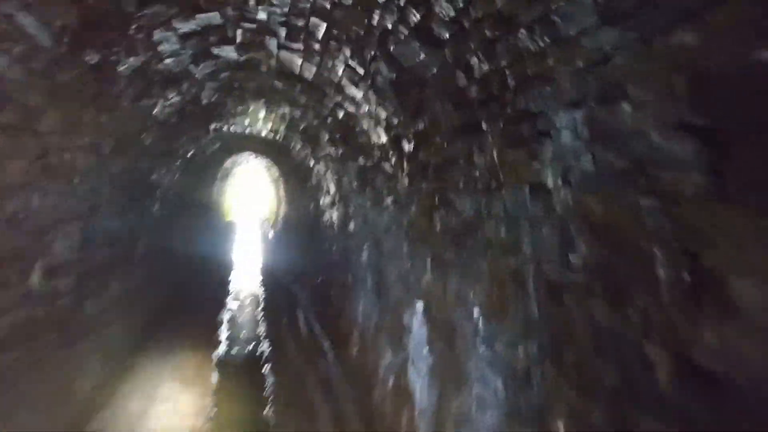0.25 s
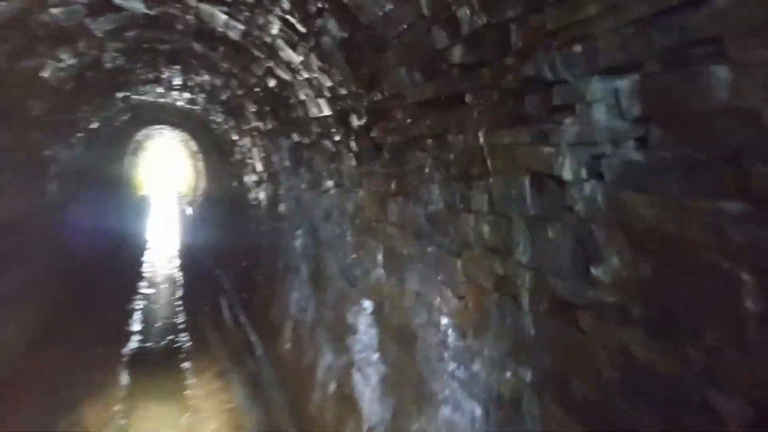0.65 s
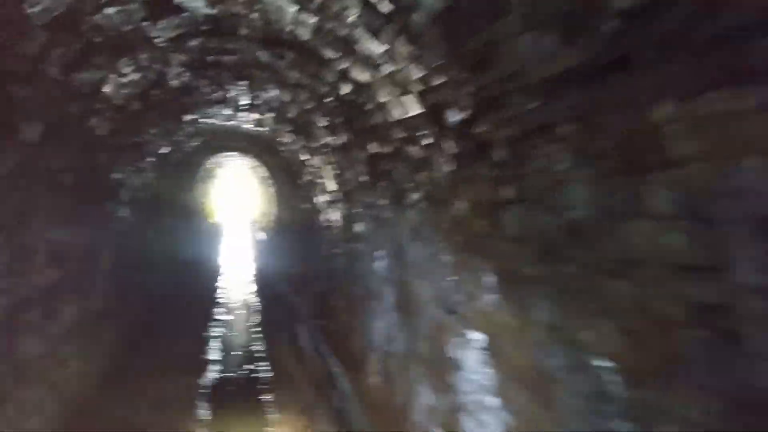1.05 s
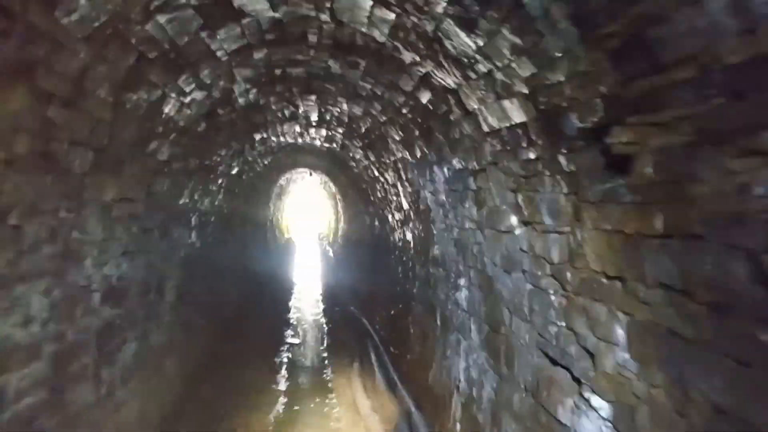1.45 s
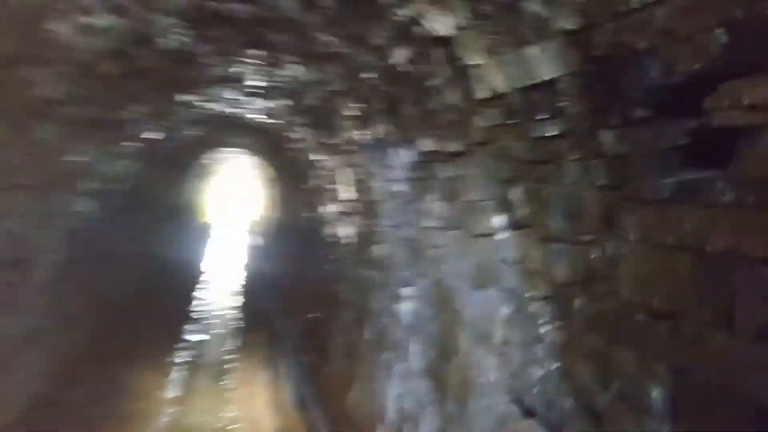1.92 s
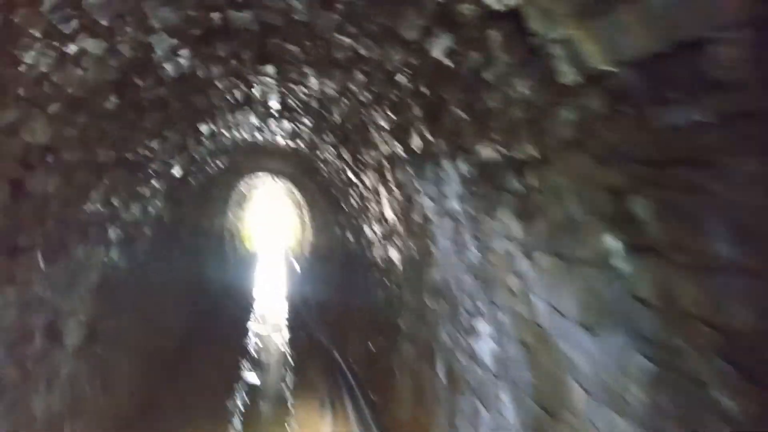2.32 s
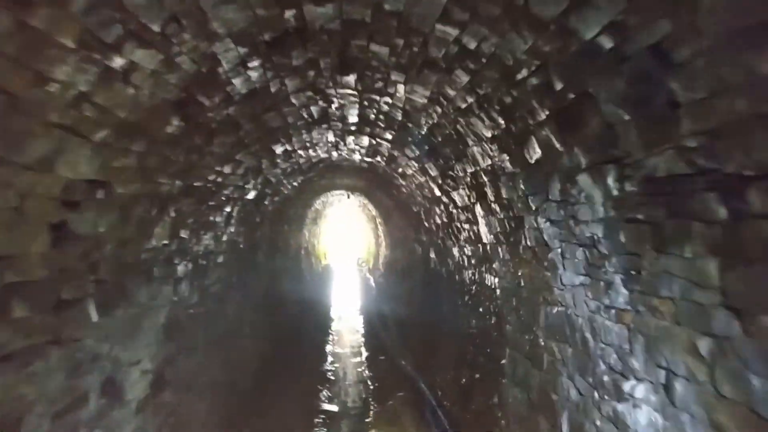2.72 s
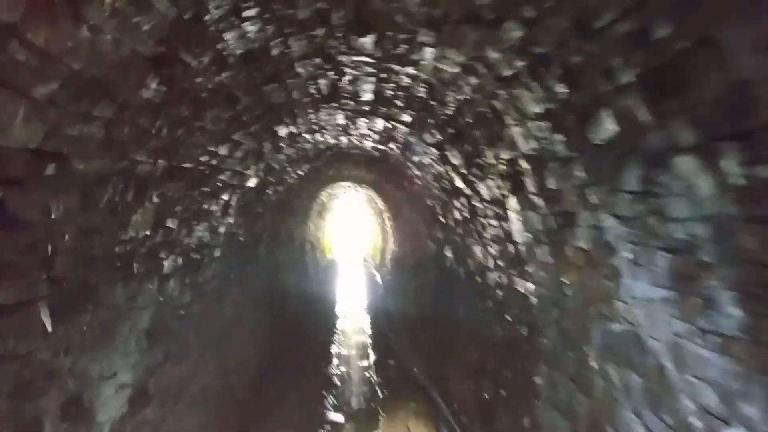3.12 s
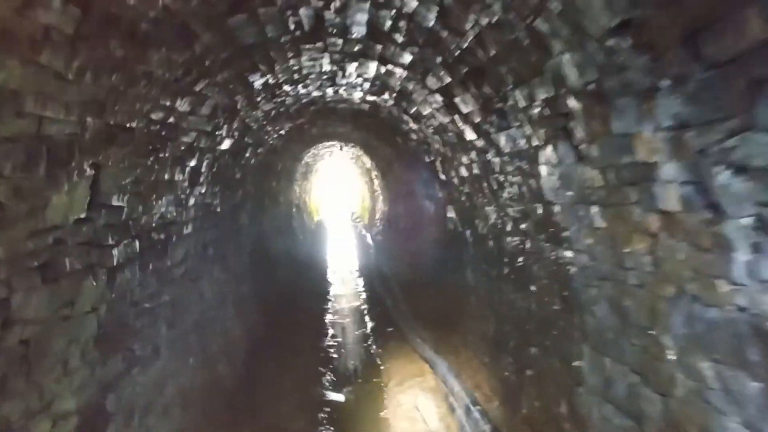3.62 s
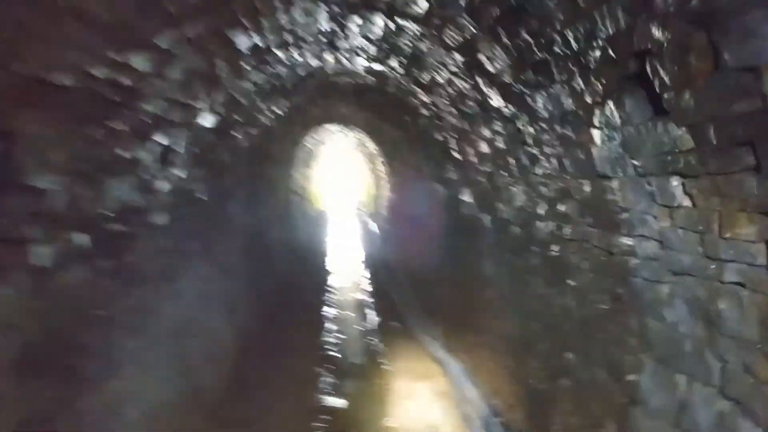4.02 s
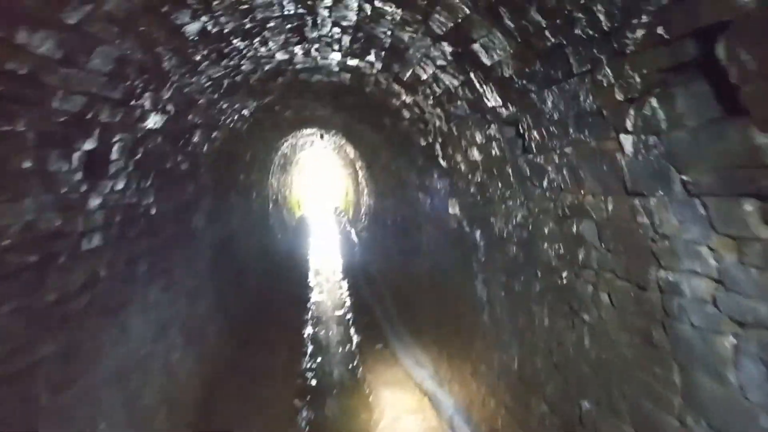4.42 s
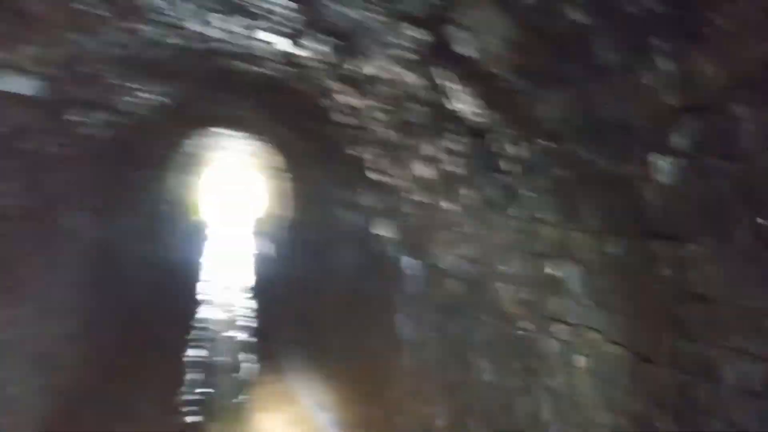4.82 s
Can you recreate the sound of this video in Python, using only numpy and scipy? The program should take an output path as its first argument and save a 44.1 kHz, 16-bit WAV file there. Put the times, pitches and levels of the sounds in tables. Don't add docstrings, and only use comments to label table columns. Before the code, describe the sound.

Feet wade briskly through shallow water in a stone tunnel, with bright splashes, droplet bursts, bubbly plops and a short arched-wall echo.

```python
import sys
import numpy as np
from scipy import signal
from scipy.io import wavfile
from scipy.ndimage import uniform_filter1d

SR = 44100
rng = np.random.default_rng(int(sys.argv[2]) if len(sys.argv) > 2 else 0)


def unload_audio(sound):
    columns = np.transpose(np.atleast_2d(sound))
    steps = np.round(np.clip(columns, -1, 1) * 32767)
    wavfile.write(sys.argv[1], SR, steps.astype(np.int16))


def level_to_linear(level):
    exponent = np.asarray(level, float) / 20
    return 10 ** exponent


N = 222836

# start in seconds, peak level in dB, pitch in Hz, length in seconds.
HEEL_THUDS = [(0.06, -62, 96, 0.04), (0.183, -64, 89.5, 0.032), (0.821, -58, 179, 0.05),
              (1.193, -63, 82, 0.069), (1.65, -53, 145, 0.079), (2.188, -56, 73, 0.029),
              (2.493, -64, 91, 0.058), (2.632, -52, 74, 0.034), (3.38, -46, 150, 0.026),
              (4.066, -59, 78.1, 0.057), (4.335, -48, 123, 0.061), (4.706, -64, 59.2, 0.03),
              (.26, -70, 112, 0.055), (.9, -64, 91, 0.048), (.993, -70, 121, .05), (1.72, -68, 70.6, 0.046),
              (2.41, -66, 85, 0.072), (2.915, -73, 82, .05), (3.189, -76, 60, .05), (3.65, -74, 132, 0.044),
              (3.806, -72, 92, 0.046), (4.901, -67, 95, 0.049)]
# frequency in Hz, level in dB per Hz.
SPRAY_COLOUR = [(180, -24), (300, -19), (462, -29), (546, -14.5), (1060, -9.5), (2520, 2.5), (4750, 1.5),
                (6520, 5.5), (8090, -4), (9880, 1.5), (12300, -4.5), (14700, -7), (16000, -8)]
# frequency in Hz, level in dB per Hz.
SLOSH_COLOUR = [(300, -26), (450, -10), (600, 2), (1000, 1.5), (1400, -4), (2200, -26)]
# frequency in Hz, level in dB per Hz.
HUSH_COLOUR = [(15, -61), (25, -6), (363, 5), (451, -26), (624, -18), (3080, -9), (4740, -33), (6560, -8),
               (7920, 3), (10400, 17), (16000, -8)]
# frequency in Hz, time to fall 60 dB in seconds.
TUNNEL_T60 = [(300, 0.16), (800, 0.26), (2000, 0.18), (6000, 0.068), (14000, 0.12)]
# frequency in Hz, level in dB per Hz.
BOOM_COLOUR = [(130, -22), (200, -30.5), (250, -11.5), (330, -1), (420, -15), (600, -30.5)]
# start in seconds, level in dB, first pitch in Hz, last pitch in Hz, length in seconds.
SLURPS = [
    (1.985, -44.5, 1850, 3600, 0.065),
    (2.004, -43, 4900, 7000, .028),
    (2.005, -44, 3300, 4300, 0.035),
    (2.02, -46, 6300, 8000, 0.03),
    (1.3, -53, 2300, 3600, .04),
    (2.769, -60, 339, 185.2, .12),
    (4.843, -41.5, 1060, 1680, 0.032),
]
# time in seconds, peak level in dB, cavity pitch in Hz, time to fall 60 dB in seconds.
LATE_CLUMPS = [
    (0.422, -37, 3050, 0.042),
    (1.0692, -25.5, 5400, 0.12),
    (2.2843, -26.5, 2350, 0.11),
    (3.2342, -32, 2280, 0.19),
    (2.752, -25, 2780, 0.12),
    (3.9625, -39, 2660, 0.15),
    (4.484, -33, 1930, 0.083),
]
# time in seconds, peak level in dB, cavity pitch in Hz, time to fall 60 dB in seconds.
SHEETS = [(0.234, -26, 6300, 0.28), (0.722, -27, 5400, 0.26), (1.156, -32, 5000, 0.29),
          (1.5504, -27, 4400, 0.31), (1.8236, -30, 5500, 0.15), (2.423, -33.5, 5400, 0.24),
          (2.494, -24.5, 6400, 0.23), (2.948, -27.5, 7600, 0.14), (3.2036, -29, 7220, 0.28),
          (3.59, -42.5, 8700, 1), (3.629, -36.5, 9100, 0.32), (0.795, -36, 6500, .1),
          (3.205, -28, 14000, 0.2), (3.9378, -26, 1930, 0.47), (4.674, -28.5, 2700, 0.25),
          (3.0, -45.5, 12000, 0.94), (0.54, -49, 10500, 0.055), (.87, -48, 13000, 0.54),
          (4.549, -42, 12000, .3), (0.45, -43.5, 6000, 0.22)]
# time in seconds, peak level in dB, cavity pitch in Hz, time to fall 60 dB in seconds.
SLAPS = [(0.271, -25.5, 2640, 0.092), (0.342, -29, 7600, 0.21), (0.646, -34.5, 2625, 0.16),
         (0.8017, -20, 8000, 0.034), (1.052, -24, 6850, 0.21), (1.442, -27.5, 2600, 0.22),
         (1.6245, -37, 2240, 0.15), (1.724, -29, 5470, 0.082), (1.7998, -29, 3600, 0.28),
         (1.8827, -31.5, 6530, 0.23), (1.943, -37, 3400, 0.13), (2.262, -27, 4050, 0.44),
         (2.3672, -31, 4100, 0.36), (3.106, -28, 3670, 0.14), (3.3471, -37, 3320, 0.58),
         (3.4031, -32, 2520, 0.19), (3.708, -22, 6800, 0.084), (4.13, -27, 7250, 0.27),
         (4.443, -24, 2650, 0.13), (4.5651, -29.5, 3800, 0.22), (4.7083, -29.5, 3680, 0.097),
         (4.81, -24, 4100, 0.24)]
# time in seconds, peak level in dB, cavity pitch in Hz, time to fall 60 dB in seconds.
LUMPS = [(0.0853, -37.5, 2520, 0.16), (0.439, -38.5, 3020, .13), (0.995, -34.5, 1880, 0.2),
         (2.0135, -34, 7050, 0.23), (2.1134, -35, 2080, 0.26), (2.5839, -35.5, 3200, 0.062),
         (2.6763, -34, 6100, 0.21), (2.701, -31.5, 4300, 0.05), (3.157, -25.5, 4500, 0.15),
         (3.2636, -36, 2700, 0.16), (4.0047, -27.5, 3950, .14), (4.0534, -32.5, 3300, 0.12),
         (4.3167, -36, 2020, 0.47), (1.2116, -46, 1900, 0.13), (4.6065, -32, 2240, 0.25),
         (4.728, -27, 3640, 0.12)]
# time in seconds, peak level in dB, cavity pitch in Hz, time to fall 60 dB in seconds.
FIRST_CONTACTS = [(0.24, -23.5, 6000, 0.025), (0.271, -28, 5800, .03), (0.3422, -23, 6400, 0.031),
                  (1.054, -23.5, 6600, .05), (1.212, -38, 2250, 0.023), (1.32, -41, 1460, 0.097),
                  (1.372, -42, 3700, 0.23), (1.442, -27.5, 3250, 0.065), (1.5563, -24, 4600, 0.056),
                  (1.799, -21.5, 4100, 0.02), (1.9452, -32.5, 3430, .025), (2.494, -23, 4500, .025),
                  (1.8252, -25.5, 6100, .025), (0.802, -31, 6500, 0.026), (3.1054, -25.5, 3140, 0.022),
                  (3.152, -22.5, 9600, 0.05), (3.156, -25, 4260, .03), (3.704, -29, 6500, 0.057),
                  (3.7096, -24, 4400, 0.043), (3.859, -44, 2800, .1), (3.944, -30, 8550, 0.064),
                  (4.005, -29, 4600, 0.03), (4.13, -28, 3000, 0.036), (4.443, -40, 2900, 0.1),
                  (4.5645, -37.5, 3200, .04), (4.6784, -42, 6500, 0.021), (4.6785, -22.5, 1600, 0.032),
                  (4.81, -22.5, 4330, .03), (0.2344, -29.5, 4500, 0.046), (3.201, -28.5, 9000, .04),
                  (4.805, -28, 3500, 0.052), (4.963, -42.5, 3200, 0.11)]
# brightness in dB per octave, swell in milliseconds,
# thinness in dB lost per octave under LOW_HZ.
LANDING = [
    (2, 5.9, 7),
    (-1.5, 7.5, 3),
    (-4.5, 5.6, 2.5),
    (-2.5, 10, 3),
    (-1.5, 1.2, 5),
]
# time in seconds, level in dB, pitch in Hz.
POPS = [(.272, -33, 5640), (.438, -29, 3080), (.8, -22, 6560), (.803, -33, 2430), (1.084, -43, 543),
        (1.127, -35, 700), (1.2125, -25.5, 1780), (1.801, -16, 3975), (2.263, -30, 3560),
        (2.492, -30, 4400), (2.518, -34, 2240), (3.105, -29, 5180), (3.158, -20.5, 4340), (3.39, -30, 300),
        (3.938, -22, 1900), (3.963, -27, 2584), (4.131, -26, 2630), (4.607, -22.5, 1790),
        (4.609, -16.5, 2470), (4.618, -23, 2070), (4.726, -38, 285), (.189, -38, 900), (.421, -36.5, 6900),
        (.495, -42, 4200), (.516, -39, 6100), (.826, -33, 2600), (.834, -32, 2900), (.862, -31, 2350),
        (.944, -37, 2300), (1.069, -28, 3700), (1.625, -31, 2500), (1.727, -31, 3020), (2.29, -26, 3200),
        (2.3, -28, 2300), (2.368, -32, 3800), (2.7, -33, 4500), (3.216, -30, 6400), (3.233, -30, 2700),
        (3.243, -30, 2310), (3.266, -31, 2700), (3.349, -31.5, 3600), (3.713, -26, 4410), (3.92, -37, 3400),
        (3.932, -33, 1950), (3.944, -32, 5450), (4.005, -27, 5080), (4.006, -30, 3000), (4.058, -33, 3300),
        (4.709, -30, 3700), (.668, -37, 2300), (2.51, -30, 6500), (2.765, -30, 6400), (3.16, -28, 5600),
        (4.783, -34, 5300), (4.812, -22, 4300)]
# time in seconds, level in dB, pitch in Hz.
BLOOPS = [(.143, -38, 537), (.188, -32, 560), (.271, -29, 2750), (.857, -47, 276), (.882, -31.5, 1770),
          (.888, -28.5, 2150), (.989, -37, 607), (.997, -30, 2095), (1.188, -34.5, 1720),
          (1.799, -24.5, 2913), (1.945, -37.5, 574), (2.05, -45, 310), (2.499, -37, 370),
          (3.106, -32.5, 3160), (3.151, -38.5, 603), (3.183, -38, 338), (3.269, -39, 1240),
          (3.288, -35, 1510), (3.313, -52, 840), (3.33, -42, 586), (3.347, -33, 3240), (3.833, -38, 1450),
          (4.021, -33.5, 1400), (4.053, -36, 784), (4.128, -37.5, 1136), (4.144, -40, 311),
          (4.695, -27.5, 1107), (4.727, -33.5, 903), (4.848, -31.5, 1074), (4.965, -35.5, 3290),
          (1.317, -42, 1310), (1.225, -41, 2100), (3.24, -36, 2410), (3.34, -40, 876), (3.36, -42, 700),
          (1.355, -45, 1970), (2.115, -38, 2060), (2.128, -36, 2450), (2.14, -42, 1950), (3.845, -37, 2750),
          (4.315, -30.5, 2290), (4.33, -34.5, 1920), (4.342, -29.5, 2185), (4.358, -36, 1510),
          (4.441, -42, 946), (4.444, -41.5, 614), (4.484, -30.5, 1920), (4.492, -44, 1590),
          (4.635, -35, 1626), (4.75, -34, 1880), (1.06, -33, 1750), (1.078, -33, 1850), (1.226, -36, 1586),
          (1.655, -37.5, 1254), (1.675, -36, 1400), (1.69, -39, 696), (2.124, -35, 2156),
          (3.952, -33, 1800)]
# time in seconds, level in dB, pitch in Hz.
RINGS = [(.081, -44, 1148), (.292, -35, 1017), (.508, -40.5, 2240), (.647, -35, 2850), (.838, -40, 569),
         (1.009, -38.5, 550), (1.214, -26, 1640), (1.443, -42, 744), (1.622, -30.5, 2260),
         (1.95, -41.5, 420), (2.032, -36, 4200), (2.224, -46, 1360), (2.243, -43, 1380), (2.493, -33, 3520),
         (2.494, -39, 740), (2.688, -38, 2056), (3.041, -40, 2370), (3.148, -38, 2210), (3.21, -45, 375),
         (3.492, -42, 1510), (3.937, -28.5, 1686), (3.966, -30, 1390), (4.083, -33.5, 2216),
         (4.112, -31, 2000), (4.564, -27, 3214), (4.612, -35, 1227), (4.668, -46, 570), (4.81, -30, 2620),
         (4.816, -31, 1237), (4.934, -35.5, 1524), (.9, -45.5, 215), (1.33, -61, 222), (1.4, -44, 3710),
         (1.85, -54, 232), (2.235, -44.5, 565), (2.7, -36, 1900), (2.765, -47, 281), (2.89, -46, 2770),
         (3.97, -40, 2680), (4.16, -42, 320), (4.2, -44, 934)]
# time in seconds, reach in seconds, spray level in dB, depth as slosh over spray in dB.
SURGES = [(.11, 0.17, -57, -6), (0.212, 0.12, -53, 1), (.35, 0.027, -43.5, 1), (0.481, 0.13, -51, -4.5),
          (.69, 0.15, -54, -8), (0.836, 0.053, -37, -8.5), (.94, 0.13, -45.5, -9), (1.03, 0.13, -40, -5),
          (1.2, 0.43, -49, -38), (1.5, 0.28, -54, -6), (1.688, 0.082, -40.5, -1), (1.931, 0.15, -45, -6.5),
          (2.058, 0.095, -46.5, -7), (2.14, 0.064, -47, -22), (2.24, 0.067, -59, 4),
          (2.33, 0.18, -50.5, -1), (2.428, 0.099, -51, 0), (2.55, 0.18, -43.5, -9.5),
          (2.768, 0.055, -37.5, -14), (2.83, 0.31, -52.5, -10.5), (2.97, 0.063, -42, -9),
          (3.22, 0.13, -45, -6), (3.334, 0.03, -48, 7.5), (3.45, 0.35, -66.5, 8.5),
          (3.72, 0.077, -37.5, -11), (3.92, 0.28, -46, -8), (4.17, 0.29, -50, -6),
          (4.333, 0.086, -43.5, -2.5), (4.485, 0.072, -44.5, -32), (4.54, .04, -54, -25),
          (4.615, 0.029, -54.5, 6.5), (4.446, 0.021, -57, 3), (4.74, 0.17, -47, -2), (4.9, .07, -47, -4),
          (5.05, 0.087, -41.5, -9.5)]
# time in seconds, reach in seconds, level in dB.
HEAVES = [(.2, 0.062, -53.5), (.75, 0.058, -67), (.86, 0.12, -60), (.34, 0.042, -67), (1.0, .1, -82),
          (1.47, 0.062, -64.5), (1.57, 0.046, -55), (1.69, 0.089, -53.5), (1.82, 0.042, -53),
          (1.97, 0.034, -52.5), (2.08, 0.1, -60), (2.24, 0.07, -68), (2.38, 0.11, -59.5),
          (2.6, 0.25, -53.5), (2.8, 0.056, -73), (2.97, 0.076, -69), (3.2, 0.11, -55.5),
          (3.36, 0.096, -52.5), (3.48, 0.27, -57.5), (3.66, 0.035, -68), (3.78, 0.13, -54), (3.95, .1, -73),
          (4.15, 0.18, -55.5), (4.33, 0.13, -56.5), (4.46, 0.043, -64), (4.62, 0.033, -59),
          (4.72, 0.073, -52), (4.83, 0.12, -58), (5.05, 0.064, -68)]

HUSH_DB, TUNNEL_DB = -67.5, -13.5
EDGE_HZ = 15950
POP_MS, BLOOP_MS, RING_MS = 3, 7.6, 12.1
SPRAY_FALL_DB, SLOSH_FALL_DB, BOOM_FALL_DB = 13, 20.5, 16.5
BUILD = 0.9
SHOULDER = 1.42
TILT_DB, TILT_BY_SPRAY = -0.4, 0.098
LOW_FADE_DB_PER_S, LOW_HZ = 218, 1400
CRACK, CRACK_T60 = 0.061, 0.0019


def evened(x):
    return x / np.sqrt(np.mean(x ** 2) + 1e-20)


def steadied(x, seconds):
    return x / np.sqrt(uniform_filter1d(x ** 2, size=round(seconds * SR)) + 1e-20)


def read(points, hz):
    f, value = np.transpose(points)
    return np.interp(np.log(hz + 1), np.log(f + 1), value)


def add(mix, s, sound):
    part = mix[max(round(s * SR), 0):][:len(sound)]
    part += sound[:len(part)]


def highpassed(x, order, hz):
    return signal.sosfilt(signal.butter(order, hz, "high", fs=SR, output="sos"), x)


def humps(s, reach, top_db, fall_db):
    grid = np.arange(0, N + 64, 64)
    off = (grid[:, None] / SR - s) / np.maximum(reach, .02)
    distance = np.maximum(off, -off / BUILD)
    power = level_to_linear(2 * (top_db - fall_db * distance ** SHOULDER)).sum(1)
    return np.interp(np.arange(N), grid, 10 * np.log10(power + 1e-11))


def water(count, colour_db, patchy_db, flicker_db, size=256):
    frames, hz = 4 * count // size + 5, np.fft.rfftfreq(size, 1 / SR)[:, None]
    a, b, patches = rng.standard_normal((frames, len(hz), 3)).T
    flicker = evened(uniform_filter1d(rng.standard_normal(frames), size=3))
    patches = uniform_filter1d(patches, size=5, axis=0)
    patches = evened(uniform_filter1d(patches, size=5, axis=1))
    t = np.arange(frames) * size / 4 / SR
    level_db = colour_db(hz, t) + patchy_db * patches + flicker_db * flicker
    z = (a + 1j * b) * level_to_linear(level_db)
    return signal.istft(z, nperseg=size, noverlap=size * 3 // 4)[1][:count]


def blurred(turns, blur_hz):
    noise = rng.standard_normal((SR // 8, 2))
    wander = uniform_filter1d(noise, size=round(SR / blur_hz), axis=0) @ [1, 1j]
    tone = (wander[:len(turns)] * np.exp(2j * np.pi * turns)).real
    return tone * np.sqrt(SR / blur_hz)


def droplets(colour, low_hz, high_hz, per_s, spread_db, cycles):
    out = np.zeros(N)
    for hz in np.geomspace(low_hz, high_hz, num=24):
        draw = rng.random(N) * 24 * SR / per_s + 1e-9
        strength = level_to_linear(spread_db * np.clip(-np.log(draw), 0, 3))
        u = np.arange(round(3 * cycles * SR / hz)) * hz / SR
        drop = np.sin(2 * np.pi * u * (1 + 0.008 * u))
        drop *= np.exp(-2.2 * u / cycles) * np.minimum(u / 1.46, 1)
        drop *= level_to_linear(read(colour, hz)) * np.sqrt(hz)
        out += signal.oaconvolve((draw < 1) * strength, drop)[:N]
    return evened(out)


def hush():
    def colour_db(hz, at):
        return read(HUSH_COLOUR, hz)
    return level_to_linear(HUSH_DB) * evened(water(N, colour_db, patchy_db=0.5, flicker_db=2.5, size=2048))


def spray_layer(spray_db):
    tilt_db = TILT_DB + TILT_BY_SPRAY * (spray_db + 27.0)
    def colour_db(hz, at):
        tilt = np.interp(at, np.arange(N) / SR, tilt_db)
        return read(SPRAY_COLOUR, hz) + tilt * np.log2(np.maximum(hz, 1200) / 4000)
    spray = steadied(water(N, colour_db, patchy_db=2.5, flicker_db=-0.5), 0.3)
    spray += level_to_linear(-8) * droplets(SPRAY_COLOUR, 1180, 6890, per_s=230, spread_db=4.5, cycles=16.0)
    return highpassed(spray, 4, 1050)


def slosh_layer():
    def colour_db(hz, at):
        return read(SLOSH_COLOUR, hz)
    slosh = steadied(water(N, colour_db, patchy_db=3.5, flicker_db=2.1, size=1024), 0.26)
    return slosh + level_to_linear(-10.0) * droplets(SLOSH_COLOUR, 363, 1550, per_s=150, spread_db=-4.5, cycles=1.73)


def boom_layer():
    def colour_db(hz, at):
        return read(BOOM_COLOUR, hz)
    return steadied(water(N, colour_db, patchy_db=7.0, flicker_db=4.5, size=2048), 0.027)


def wading():
    s, reach, top_db, depth_db = np.transpose(SURGES)
    spray_db = humps(s, reach, top_db, SPRAY_FALL_DB)
    slosh_db = humps(s, reach, top_db + depth_db, SLOSH_FALL_DB)
    boom_db = humps(*np.transpose(HEAVES), BOOM_FALL_DB)
    mix = level_to_linear(spray_db) * spray_layer(spray_db)
    mix += level_to_linear(slosh_db - 3.5) * slosh_layer()
    return mix + level_to_linear(boom_db - 0.5) * boom_layer()


def rumble():
    s, reach, top_db, depth_db = np.transpose(SURGES)
    slosh_db = humps(s, reach, top_db + depth_db, SLOSH_FALL_DB)
    def colour_db(hz, at):
        return -18 * abs(np.log2((hz + 1) / 95))
    shake = water(N, colour_db, patchy_db=1, flicker_db=2.5, size=2048)
    return level_to_linear(-86.5 + 0.4 * (slosh_db + 57.5)) * evened(shake)


def thud(db, hz, length):
    t = np.arange(round(length * SR)) / SR
    turns = hz * t * (1.1 - 0.13 * t / length)
    tone = np.sin(2 * np.pi * turns) + 0.9 * blurred(turns, 70)
    return level_to_linear(db - 5.5) * np.hanning(len(t)) * tone


def bubble(db, hz, fall_ms, rise=0.021):
    fall_ms = np.clip(fall_ms, max(3, 2000 / hz), 16)
    u = np.arange(SR // 8) / SR * 1000 / fall_ms
    turns = np.cumsum(hz * (1 + rise * (np.minimum(u, 3) - .5))) / SR
    tone = np.sin(2 * np.pi * turns) + .35 * blurred(turns, .15 * hz)
    onset = np.sin(np.pi / 2 * np.minimum(u / 0.3, 1)) ** 2
    return level_to_linear(db + 1.5 - 16.6 * u) * onset * tone


def splash(db, cavity_hz, tilt_db, t60, swell_ms, thin_db, plips):
    t = np.arange(SR // 3) / SR
    def colour_db(hz, at):
        bump_db = 5.9 * np.exp(-(np.log2((hz + 1) / cavity_hz) / 0.37) ** 2)
        bright_db = tilt_db * np.log2(np.maximum(hz, 900) / 4000)
        octaves_low = np.clip(np.log2(LOW_HZ / (hz + 1)), 0, 2)
        drained_db = (thin_db + LOW_FADE_DB_PER_S * at) * octaves_low
        return read(SPRAY_COLOUR, hz) + bright_db + bump_db - drained_db
    shower = evened(water(len(t), colour_db, patchy_db=2.5, flicker_db=0.26))
    shower += level_to_linear(-5) * np.roll(plips, rng.integers(N))[:len(t)]
    swell = np.clip(swell_ms, 1, 15) / 1000
    after = np.maximum(t - swell, 0)
    shape = CRACK * level_to_linear(-60 * after / CRACK_T60)
    shape += 0.055 * level_to_linear(-60 * after / 0.2)
    shape += 0.89 * level_to_linear(-60 * after / max(t60, .02))
    lead = 0.44 * swell
    return lead, level_to_linear(db - 7.5) * shower * shape * np.minimum(t / swell, 1)


def slurp(db, first_hz, last_hz, length):
    count = round(length * SR)
    turns = np.cumsum(np.geomspace(first_hz, last_hz, count)) / SR
    tone = np.sin(2 * np.pi * turns) + .45 * blurred(turns, 0.05 * last_hz)
    return level_to_linear(db) * np.hanning(count) * evened(tone)


def tunnel(x):
    taps = np.zeros(SR // 2)
    at = np.arange(260, len(taps) - 20, 20)
    taps[at + rng.integers(0, 20, len(at))] = rng.choice([-1., 1.], len(at))
    hz, t, z = signal.stft(taps, SR, nperseg=256)
    fade = level_to_linear(-60 * t / read(TUNNEL_T60, hz)[:, None])
    tail = signal.istft(z * fade, SR, nperseg=256)[1]
    return signal.fftconvolve(x, tail / np.linalg.norm(tail))[:N]


def scene():
    near, heels = wading(), rumble()
    for s, *row in HEEL_THUDS:
        add(heels, s, thud(*row))
    for table, fall_ms in [(POPS, POP_MS), (BLOOPS, BLOOP_MS), (RINGS, RING_MS)]:
        for s, db, hz in table:
            add(near, s - .001, bubble(db, hz, fall_ms))
    plips = droplets(SPRAY_COLOUR, 1153, 6310, per_s=500, spread_db=1.5, cycles=13.0)
    kinds = [SHEETS, SLAPS, LUMPS, LATE_CLUMPS, FIRST_CONTACTS]
    for table, (tilt_db, swell_ms, thin_db) in zip(kinds, LANDING):
        for s, db, cavity_hz, t60 in table:
            lead, sound = splash(db, cavity_hz, tilt_db, t60, swell_ms, thin_db, plips)
            add(near, s - lead, sound)
    for s, *row in SLURPS:
        add(near, s - .001, slurp(*row))
    near = highpassed(near, 3, 220)
    heels = highpassed(heels, 2, 30)
    return (near + level_to_linear(TUNNEL_DB) * tunnel(near) + heels + hush())[None]


def low_pass(x):
    return signal.sosfilt(signal.butter(12, 16520, fs=SR, output="sos"), x)


def record(dry):
    edge = signal.firwin(numtaps=383, cutoff=EDGE_HZ, window=("kaiser", 8), fs=SR)
    mix = signal.oaconvolve(dry, edge[None], "same")
    return low_pass(mix)


dry = scene()
out = record(dry)
unload_audio(out)
```